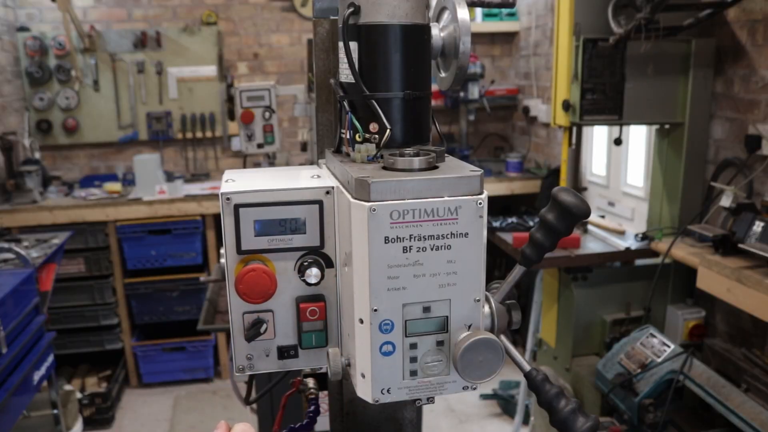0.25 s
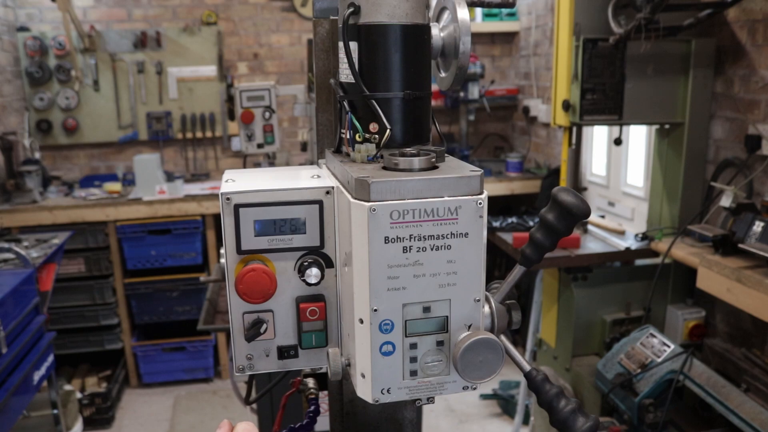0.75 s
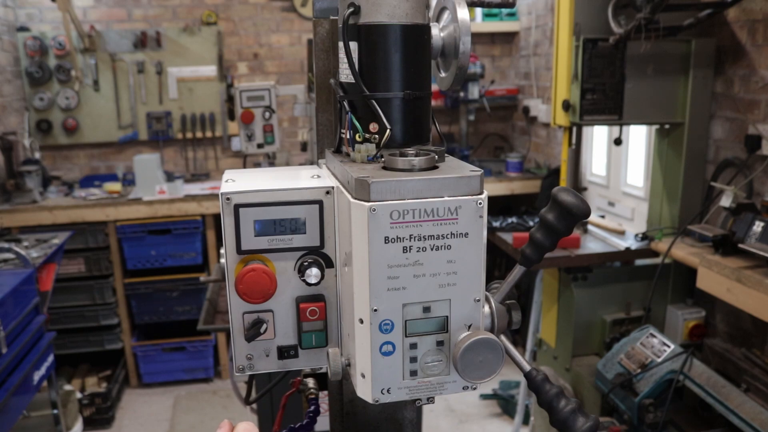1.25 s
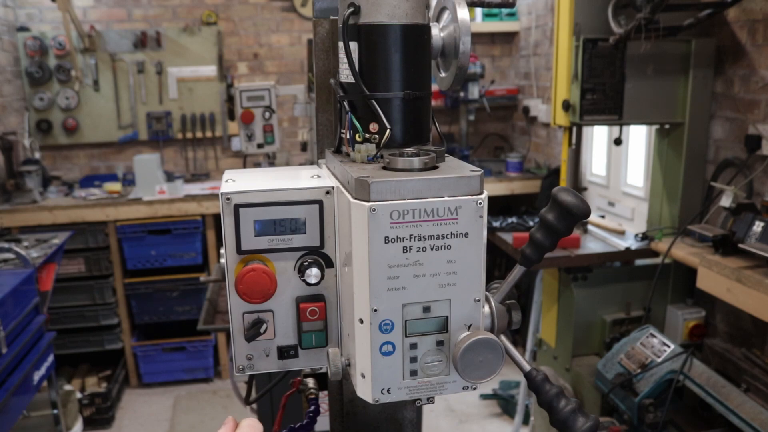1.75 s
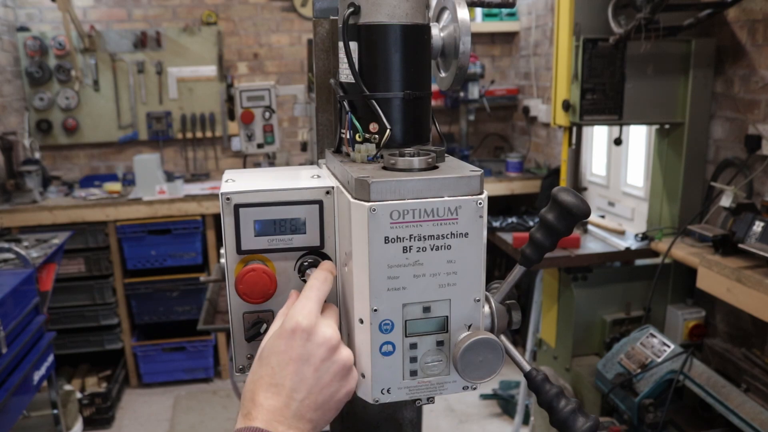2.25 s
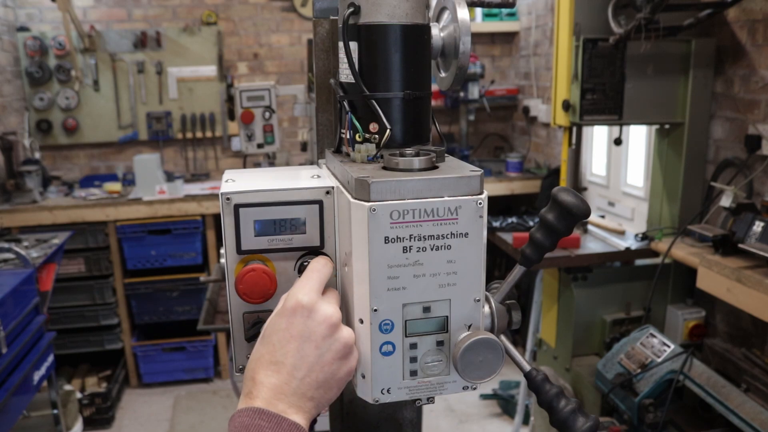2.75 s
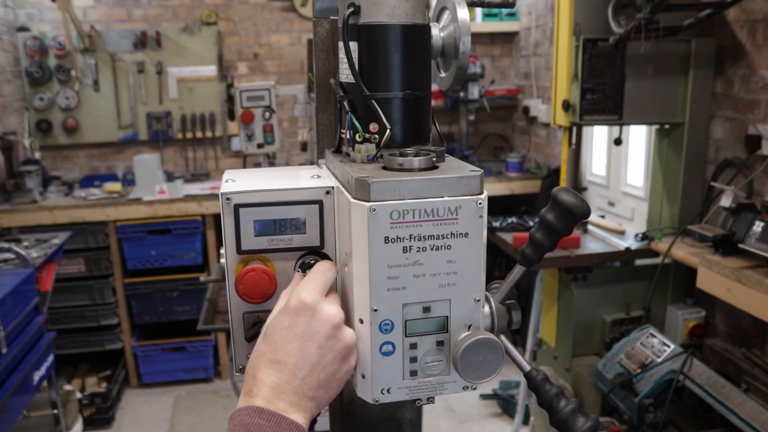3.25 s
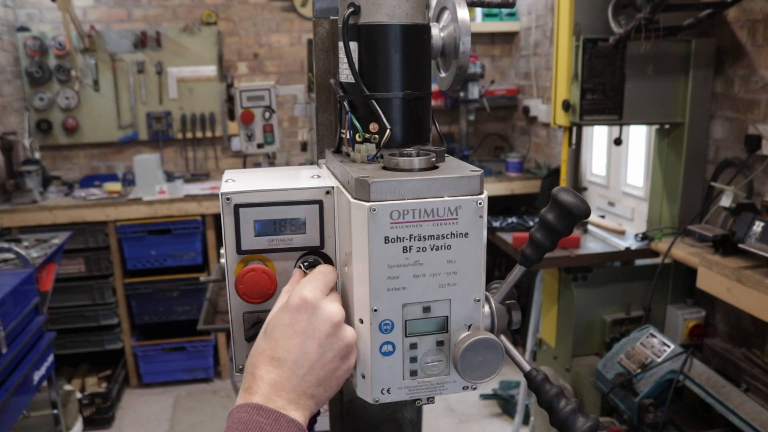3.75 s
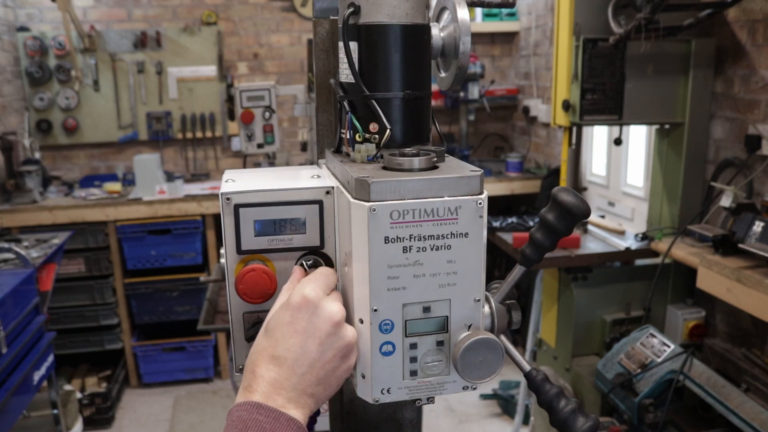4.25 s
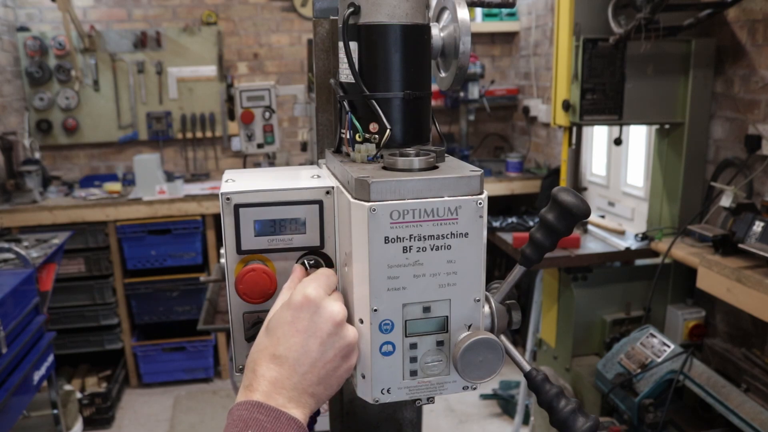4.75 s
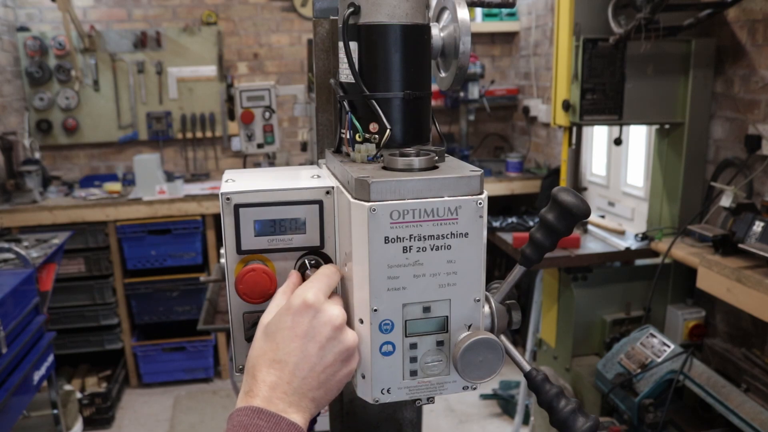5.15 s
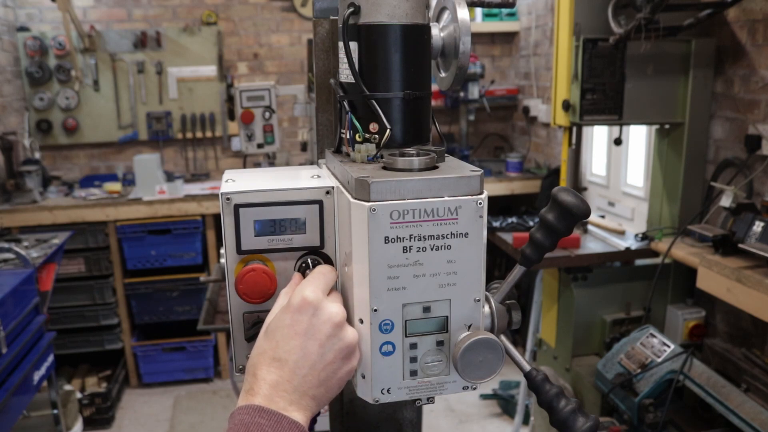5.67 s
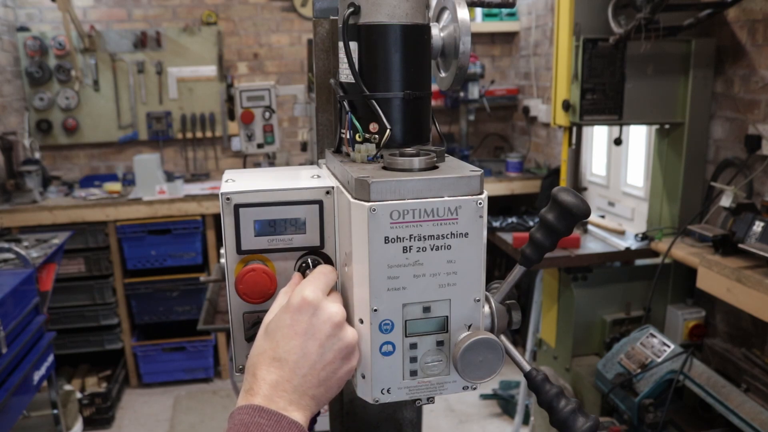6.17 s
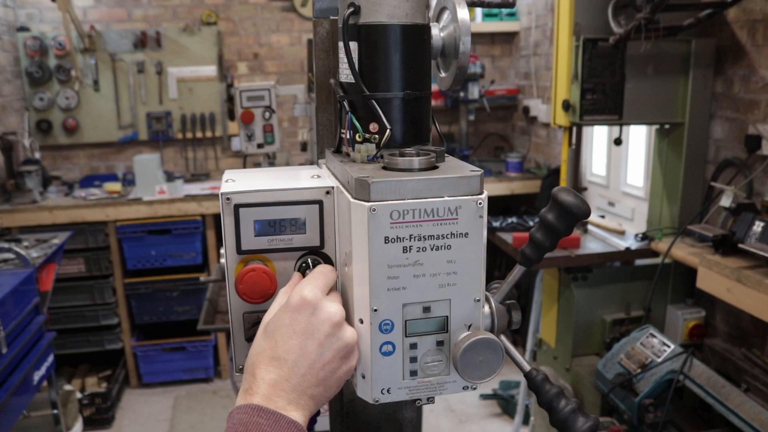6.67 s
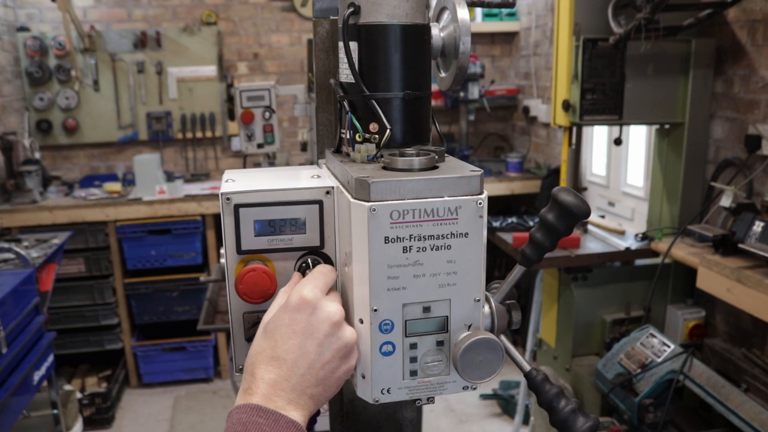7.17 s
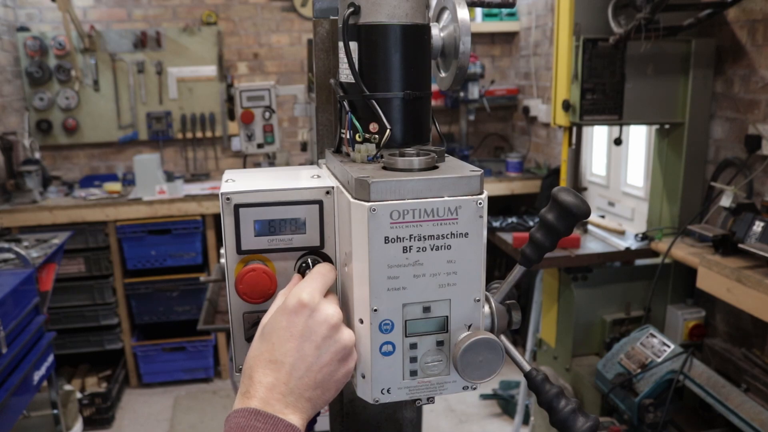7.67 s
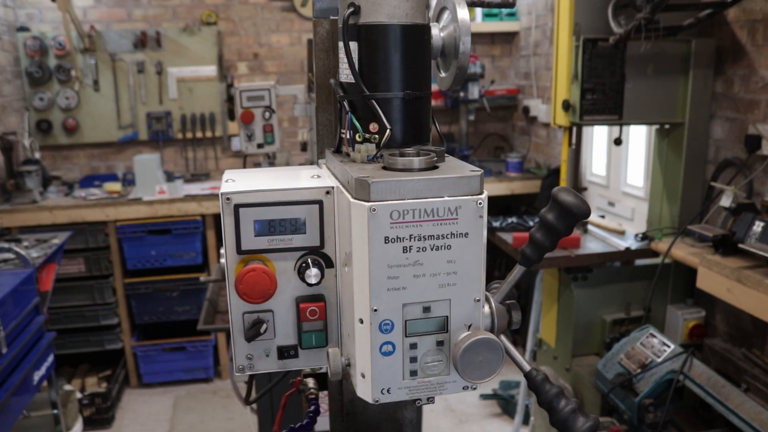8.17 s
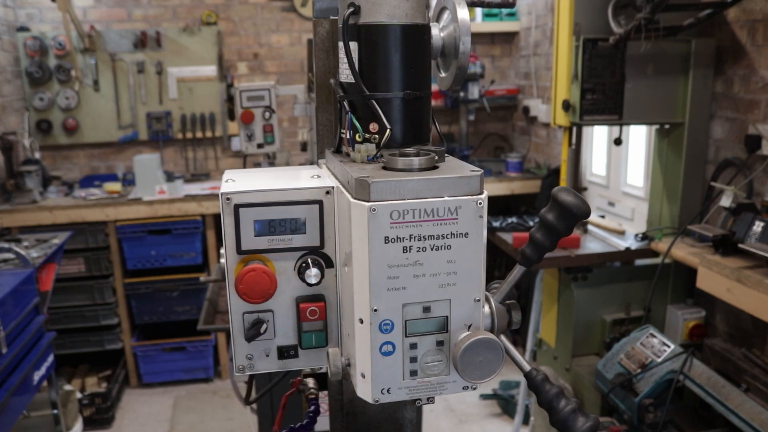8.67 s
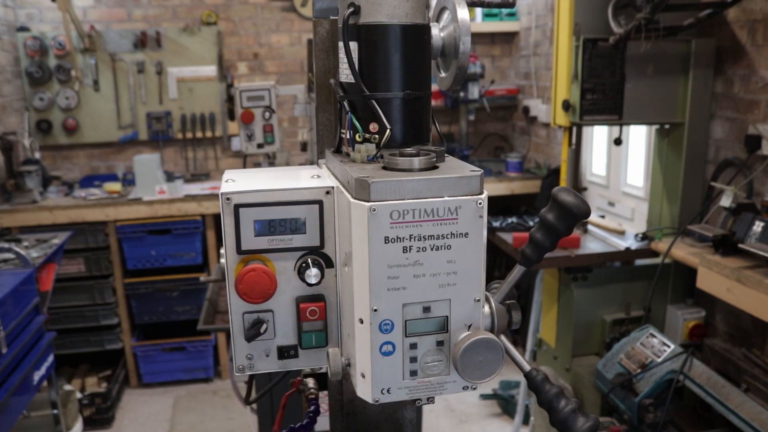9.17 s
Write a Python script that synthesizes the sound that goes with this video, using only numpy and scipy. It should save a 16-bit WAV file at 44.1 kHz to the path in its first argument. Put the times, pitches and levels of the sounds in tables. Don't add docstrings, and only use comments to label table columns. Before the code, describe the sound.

Slow gear clatter and brush ticking in a workshop machine climb in speed, pitch and loudness, settling into a dense, bright, hard rattling drone.

```python
import sys
import numpy as np
from scipy import signal
from scipy.fft import rfft, irfft
from scipy.io import wavfile
from scipy.ndimage import uniform_filter1d, map_coordinates

SR = 44100
rng = np.random.default_rng(int(sys.argv[2]) if len(sys.argv) > 2 else 0)


def transcribe(signal):
    frames = np.atleast_2d(signal).T
    limited = np.clip(frames, -1, 1)
    pcm = np.round(limited * 32767).astype(np.int16)
    wavfile.write(sys.argv[1], SR, pcm)


def nominal_scale(level):
    x = np.asarray(level, float) / 20
    return 10 ** x


N = 415422
T = np.arange(N) / SR
GEAR_RATIO = 20 / 37
RIPPLE_HZ, RIPPLE_START = 99.915, .06

# time in seconds, speed in turns per second.
MOTOR_SPEED = [(0.0, 13.32), (0.39, 13.09), (0.89, 11.61), (1.61, 10.96), (3.35, 10.64), (3.6, 11.88),
               (3.92, 15.16), (4.57, 23.99), (4.94, 28.42), (5.22, 31.1), (5.66, 34.1), (6.14, 38.5),
               (6.41, 40.17), (6.71, 41.09), (7.38, 42.1), (8.13, 42.63), (9.42, 42.87)]


def turns():
    s, per_s = np.transpose(MOTOR_SPEED)
    speed = np.interp(T, s, per_s)
    return np.cumsum(speed) / SR + .165, speed / speed.max()


def law(top_db, slope_db, bend_db):
    octaves = np.log2(turns()[1])
    return top_db + slope_db * octaves + bend_db * octaves ** 2


def hand():
    on_s, off_s, move_s = 2.27, 7.9, .04
    return np.clip(np.minimum(T - on_s, off_s - T) / move_s + .5, 0, 1)


def tooth_strikes(gear, fast):
    ripple = np.cos(2 * np.pi * (RIPPLE_HZ * T + RIPPLE_START))
    runout = np.cos(gear - 1.6) + 0.28 * np.cos(2 * gear - 3.1)
    runout += 1.17 * np.cos(3 * gear - 2.2) + 0.34 * np.cos(4 * gear + 1.4)
    shake_db = (2.65 + 0.93 * fast) * ripple + (2.2 - 1.15 * fast) * runout + 0.25 * wander(14)
    struck = rng.random(N) < (120 + 1900 * fast) / SR
    size_db = 3.76 * np.minimum(rng.exponential(1, N), 1.17 + 1.9 * fast)
    sign = rng.choice([-1., 1.], N)
    return evened(struck * nominal_scale(size_db) * sign * nominal_scale(shake_db), 8000)


# multiple of the gear speed, level in dB at full speed, power of speed, phase waver in radians.
TOOTH_TONES = [
    (34, -22, 14, 1.6),
    (38, -14, 40, .5),
    (42, -19, -.6, 2.2),
]


def tooth_tones(gear, fast):
    out = np.zeros(N)
    for order, db, power, waver in TOOTH_TONES:
        level = nominal_scale(db - 2.0 + 3.1 * wander(19)) * np.maximum(fast, .45) ** power
        out += level * np.sin(order * gear + waver * wander(30))
    return out


# pitch in Hz, level in dB per Hz.
SLOW_COVERS = [(240, -84), (400, -50), (444, -19), (476, -11.5), (658, -15.5), (770, -3.5), (970, 3),
               (1400, -10.5), (1820, -56), (3080, -120)]
FAST_COVERS = [(240, -48), (400, -23.5), (471, -7.5), (528, 1), (634, -4.5), (864, 5), (1050, -1),
               (1400, -3.5), (1820, -22.5), (3080, -120)]
# pitch in Hz, width in Hz, dB above the broad colour.
HEAD_RINGS = [(483.6, 12.4, 10), (548, 51, 5.5), (801, 32, 5), (850, 18, 0), (1047, 8.7, -22),
              (1584, 17, 4.5), (1711, 32, 6.5), (2023, 4.3, 15), (2276, 19, 6), (2454, 27, 4),
              (2470, 9.2, 4.5), (2827, 50, 8.5), (2917, 44, 7.5), (3015, 28, 5), (3155, 22, -1),
              (3530, 35, 6), (3710, 200, 3.5), (3895, 22, 7), (4290, 19, 8.5), (5270, 33, 6)]


def cover_boom(push, fast):
    share = np.clip(4.33 * fast - .95, 0, 1)
    slow = evened(coloured(push, SLOW_COVERS, HEAD_RINGS), 12000)
    quick = evened(coloured(push, FAST_COVERS, HEAD_RINGS), 12000)
    return evened(np.sqrt(1 - share) * slow + np.sqrt(share) * quick, 12000)


# pitch in Hz, level in dB per Hz.
HEAD_COLOUR = [(210, -83), (350, -34.5), (433, -32), (529, -9), (631, -28.5), (863, 12), (1360, -16.5),
               (1740, -6), (2130, -9), (2540, -3.5), (3140, -8), (3740, -5.5), (5250, -9.5), (5870, -18.5),
               (7000, -23), (9100, -18), (15400, -120)]


def gears():
    turn, fast = turns()
    gear = 2 * np.pi * GEAR_RATIO * turn
    strikes = tooth_strikes(gear, fast)
    wheel = rng.integers(0, 5, N)
    blows = [smeared(strikes * (wheel == k)) for k in range(5)]
    rolling = rng.standard_normal(N)
    grind = (0.17 + 0.36 * fast) * rolling

    deep = coloured(sum(blows[:3]) + grind, HEAD_COLOUR, HEAD_RINGS)
    light = coloured(sum(blows[2:]) + grind, HEAD_COLOUR, HEAD_RINGS)
    deep = deep + nominal_scale(-4.5) * shop(deep)
    light = light + nominal_scale(-33.0) * shop(light)
    boom = cover_boom(0.33 * sum(blows) + rolling + tooth_tones(gear, fast), fast)

    body = evened(band(deep, 1300, 2200), 12000)
    panel = evened(band(deep, 2200, 2650), 12000)
    face = evened(band(deep, 2650, 3200), 12000)
    edge = evened(band(light, 3200, 7000), 12000)
    body = nominal_scale(-7.5) * body + nominal_scale(0.47 - 3 * hand()) * panel
    edge = edge * nominal_scale(0.77 * wander(16) + 1.15 * np.cos(gear - 4.7))
    spindle = np.exp(4.1 * (np.cos(gear / 2 - 4.4) - 1))
    edge = edge + 2.14 * (1 - fast) * spindle * band(edge, 3320, 3940)

    levels = [(body, law(-25, 5.53, -1.45)), (boom, law(-37, 6.5, -0.7)),
              (face, law(-28, 4.7, -2.7)), (edge, law(-28.5, 7.1, -2.35))]
    return sum(nominal_scale(db + 0.51 * wander(9)) * part for part, db in levels)


def chance_knocks():
    crest_s = (np.arange(1, 935) - RIPPLE_START) / RIPPLE_HZ
    at, fast = np.round(crest_s * SR).astype(int), turns()[1]
    pull = np.clip(np.gradient(fast)[at] * SR / .3, 0, 1)
    struck = rng.random(len(at)) < .19 + .15 * pull
    size, bright, late = rng.standard_normal((3, len(at)))
    s = crest_s + .004 * (1 - fast[at]) * late
    peak_db = law(-17, 5.1, -1.7)[at] + 2.5 * np.clip(size, -2, 1.5)
    bright_db = -10 + 6.5 * pull + 4.0 * np.clip(bright, -2, 1)
    return np.transpose([abs(s), peak_db, bright_db])[struck]


def proud_tooth():
    at = np.flatnonzero(np.diff(np.floor(GEAR_RATIO * turns()[0] - .717)))
    size, bright = rng.standard_normal((2, len(at)))
    peak_db = law(-16.5, 5.6, -0.45)[at] + 1.5 * size
    return np.transpose([at / SR, peak_db, -14 + 2 * np.clip(bright, -2, 1)])


# time in seconds, peak in dB, brightness in dB.
HARD_KNOCKS = [(0.3681, -20, -10), (0.16, -15.5, -19), (0.188, -23, -9), (1.7983, -20.5, -17),
               (0.3955, -20, -12), (0.5089, -16.5, -15), (0.5586, -21, -16), (0.7148, -19, -11),
               (1.9677, -21, -19), (0.9996, -24, -12), (1.3818, -23, -15), (1.5289, -20.5, -15),
               (2.138, -19, -12), (3.1697, -24, -6), (1.9989, -26, -23), (2.3101, -22, -12),
               (2.2268, -23, -21), (3.2395, -24, -12), (3.8741, -18.5, -10), (3.9824, -22, -6),
               (4.0911, -16.5, -9), (4.6448, -13, -8), (5.3522, -10, -20), (6.1822, -10.5, -15),
               (7.9058, -4.5, -15), (7.9155, -8, -9), (8.045, -4, -14), (8.2156, -9.5, -5),
               (8.6037, -5, -18), (9.1779, -7, -17)]


def knocks():
    lead_s = .0015
    out = np.zeros(N)
    blows = np.concatenate([HARD_KNOCKS, chance_knocks(), proud_tooth()])
    for wheel in range(3):
        blow = np.zeros(2 ** 13)
        blow[0] = 1
        ring = coloured(smeared(blow, rise_s=0.0013), HEAD_COLOUR, HEAD_RINGS)[:2 ** 13]
        dull, bright = band(ring, 1900, 3080), band(ring, 3300, 5080)
        s, peak_db, bright_db = blows[wheel::3].T
        at = np.round(abs(s - lead_s) * SR).astype(int)
        for shape, db in [(dull, peak_db - 6.5), (bright, peak_db + bright_db + 1.0)]:
            train = np.zeros(N)
            train[at] = nominal_scale(db)
            out += signal.oaconvolve(train, shape / abs(shape).max())[:N]
    return out + nominal_scale(-7) * shop(out)


BARS = 32


def bar_ticks(turn, fast):
    count = np.arange(np.ceil(turn[0] * BARS), turn[-1] * BARS - 1).astype(int)
    bar = count % BARS
    height, spacing = rng.standard_normal((2, BARS))
    late, hard = rng.standard_normal((2, len(count)))
    paired = (-1.) ** count
    angle = 2 * np.pi * count / BARS
    wobble = .034 * np.sin(angle + .6) + .013 * np.sin(2 * angle + 2.1) + .013 * np.sin(3 * angle + 4.2)
    bounce = np.interp(count / BARS, turn, fast) ** 8
    place = count + wobble + (.004 + .006 * bounce) * spacing[bar]
    place = place + (.004 + .001 * bounce) * paired + (.005 + .005 * bounce) * late
    at = np.interp(place / BARS, turn, T) * SR
    size = 1 + .12 * height[bar] + .06 * paired + .17 * hard
    near = np.round(at).astype(int)[:, None] + np.arange(-8, 9)
    pulse = np.sinc(near - at[:, None]) * np.hanning(19)[1:-1]
    ticks = np.zeros(N + 20)
    np.add.at(ticks, near + 8, size[:, None] * pulse)
    return evened(smeared(np.diff(ticks[8:N + 9]), rise_s=.0003), 8000)


# pitch in Hz, level in dB per Hz.
BRUSH_COLOUR = [(2650, -56), (4500, -12), (5630, 1.5), (6720, 4), (7410, -8), (8020, -8), (10100, -11),
                (13500, -16), (14700, -16.5), (15700, -23)]
# pitch in Hz, width in Hz, dB above the broad colour.
CAN_RINGS = [(6710, 130, 3), (8070, 510, 9.5), (8865, 150, 8), (9060, 140, 5), (10030, 170, 6.5),
             (10720, 220, 4), (10330, 280, 5.5), (11350, 500, 7), (12450, 550, 7), (13100, 250, -2),
             (13750, 350, 4), (14400, 300, 1)]


def brushes():
    turn, fast = turns()
    ticks = bar_ticks(turn, fast)
    edge_passing = np.exp(-(turn * BARS % 1) / 0.71)
    scrape = evened((1.0 + edge_passing) * rng.standard_normal(N))
    scrape_level = 1.05 - .6 * np.clip(3 * fast - 1.6, 0, 1) + .05 * fast ** 8
    sound = coloured(ticks + scrape_level * scrape, BRUSH_COLOUR, CAN_RINGS)
    high_spot = np.exp(0.72 * (np.cos(2 * np.pi * (turn + 0.017)) - 1))
    lift = np.exp(3.1 * (np.cos(2 * np.pi * (turn - .22)) - 1))
    low = evened(band(sound, 3900, 12600), 12000) * nominal_scale(-3.5 * lift + 2.2 * fast * high_spot)
    high = evened(band(band(sound, 9500, 17000), 9000, 18000), 12000)
    high = high * nominal_scale((11.5 - 6 * fast) * high_spot)
    both = low + nominal_scale(-6.5 + 2.8 * fast) * high
    return nominal_scale(law(-38, 5.5, -1.32)) * evened(both + nominal_scale(-12) * shop(both), 12000)


# pitch in Hz, level in dB when slow, level in dB when fast, waver in dB.
HUM_TONES = [
    (66, -76, -73, 2.6),
    (99.92, -64.5, -62.5, .8),
    (292, -68, -88, .8),
    (1000, -57, -57, .4),
]


def hum():
    fast = turns()[1]
    out = np.zeros(N)
    for hz, slow_db, fast_db, waver_db in HUM_TONES:
        level_db = slow_db + (fast_db - slow_db) * fast + waver_db * wander(11)
        if hz < 80:
            level_db = level_db + 6 * np.clip(4.6 * fast - 1.3, 0, 1) * hand()
        phase = 2 * np.pi * hz * T + .3 * waver_db * wander(5)
        out += nominal_scale(level_db) * np.sqrt(2) * np.sin(phase)
    return out


def stand():
    level_db = law(-62.5, -0.87, -2.65) + 1.2 * wander(13)
    return nominal_scale(level_db) * np.sqrt(2) * np.sin(2 * np.pi * 140 * T + 0.49 * wander(9.5))


# pitch in Hz, level in dB per Hz.
ROOM_COLOUR = [(12, -47), (20, -22), (48, -13), (92, -4), (114, -14), (145, -5), (187, -7), (293, -9),
               (393, -12.5), (480, -14.5), (620, -49), (1060, -120)]
# time in seconds, dB over the rumble, width in seconds.
SHOP_THUDS = [
    (6.24, 2, 0.23),
    (7.77, 3, .05),
    (9.42, 5.5, 0.27),
]


def room():
    level_db = law(-67, 2.8, .1) + 4.0
    for s, db, width_s in SHOP_THUDS:
        level_db = level_db + db * np.exp(-((T - s) / width_s) ** 2)
    colour = ROOM_COLOUR + [(700, -71)]
    return nominal_scale(level_db) * evened(coloured(rng.standard_normal(N), colour))


def shop(x):
    at = np.arange(200, SR // 2, 20)
    taps = np.zeros(SR // 2 + 20)
    sign = rng.choice([-1., 1.], len(at))
    taps[at + rng.integers(0, 20, len(at))] = sign * nominal_scale(-60 * at / SR / .33)
    return signal.oaconvolve(x, taps / np.linalg.norm(taps))[:N]


def smeared(x, rise_s=0.00088):
    t = np.arange(512) / SR
    paths = rfft(t * np.exp(-t / rise_s) * rng.standard_normal(len(t)))
    return signal.oaconvolve(x, irfft(paths / (abs(paths) + 1e-12)))[:N]


def coloured(x, points, rings=()):
    hz = np.abs(np.fft.fftfreq(2 ** 14, 1 / SR))
    f, value = np.transpose(points)
    db = np.interp(np.log(hz + 1), np.log(f + 1), np.maximum(value, -90))
    for ring_hz, width, ring_db in rings:
        db = db + ring_db / (1 + (2 * (hz - ring_hz) / width) ** 2)
    log_gain = db * np.log(10) / 20
    minimum_phase = -signal.hilbert(log_gain).imag
    taps = np.fft.ifft(np.exp(log_gain + 1j * minimum_phase)).real[:2 ** 13]
    return signal.oaconvolve(x, taps)[:N]


def band(x, lo_hz, hi_hz):
    return signal.sosfilt(signal.butter(3, [lo_hz, hi_hz], "band", fs=SR, output="sos"), x)


def evened(x, span=None):
    if span is None:
        power = np.mean(x ** 2)
    else:
        power = uniform_filter1d(uniform_filter1d(x ** 2, span), span)
    return x / np.sqrt(power + 1e-20)


def wander(per_s):
    steps, coarse = rng.standard_normal(400), T[::64]
    return evened(np.interp(T, coarse, map_coordinates(steps, [coarse * per_s + 3], order=3)))


def scene():
    return (gears() + knocks() + brushes() + hum() + stand() + room())[None]


def top_cut(x):
    return signal.sosfilt(signal.butter(12, 15750, fs=SR, output="sos"), x)


def record(dry):
    return top_cut(dry)


dry = scene()
out = record(dry)
transcribe(out)
```